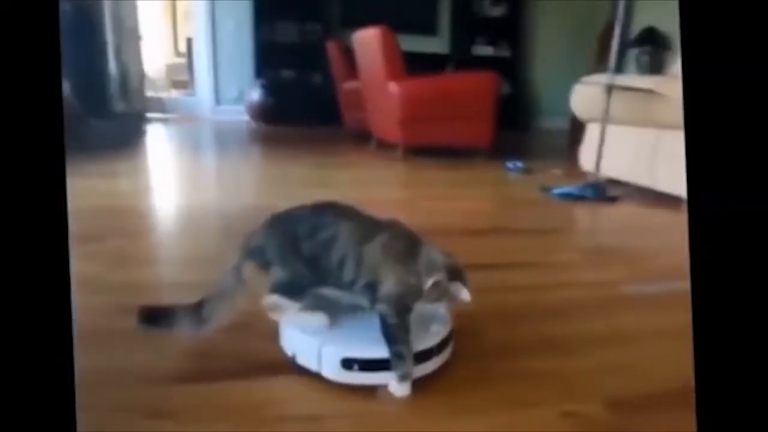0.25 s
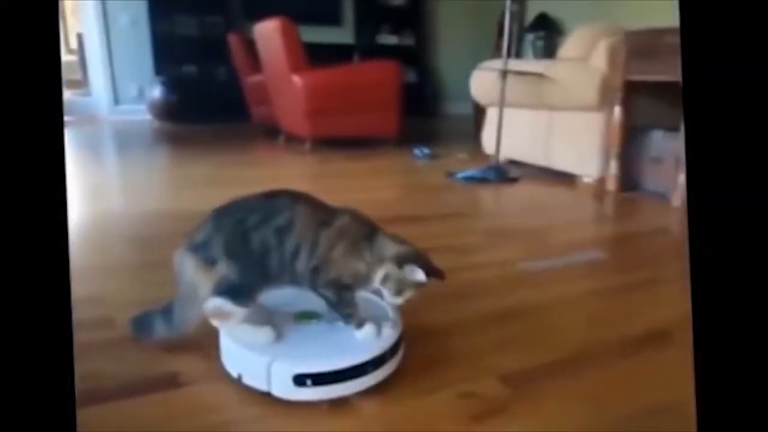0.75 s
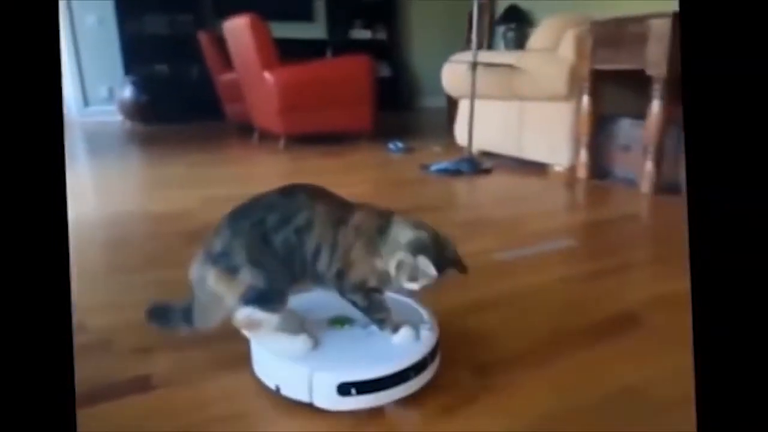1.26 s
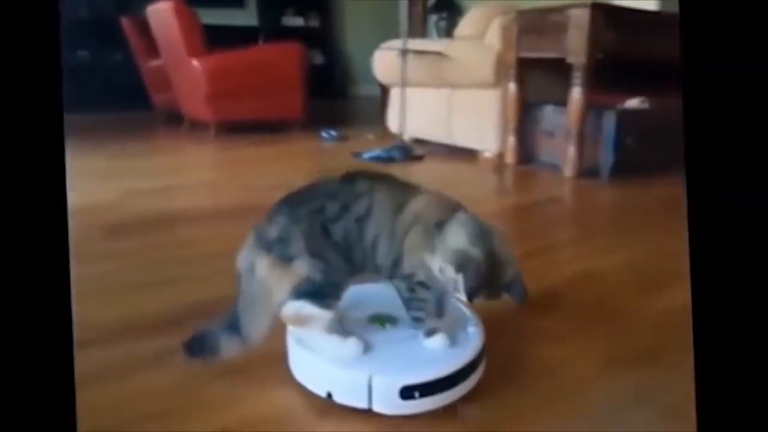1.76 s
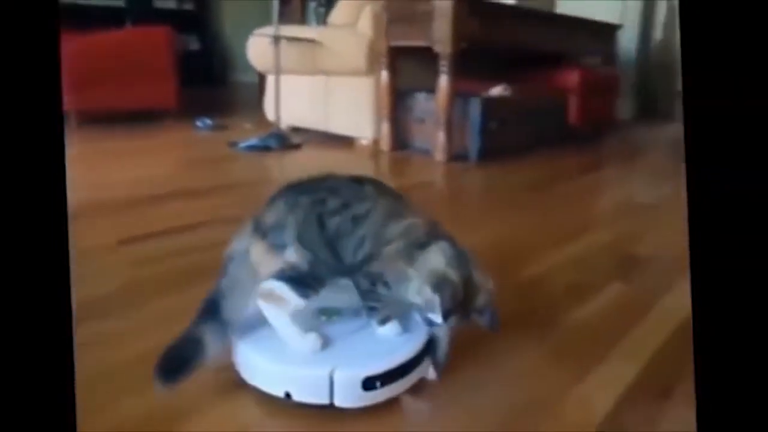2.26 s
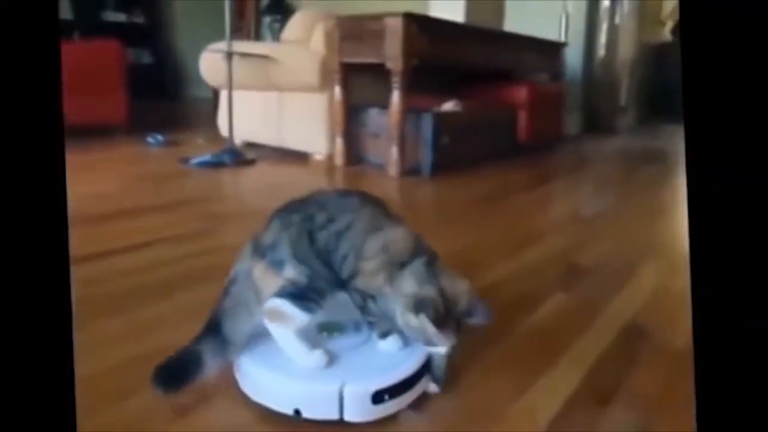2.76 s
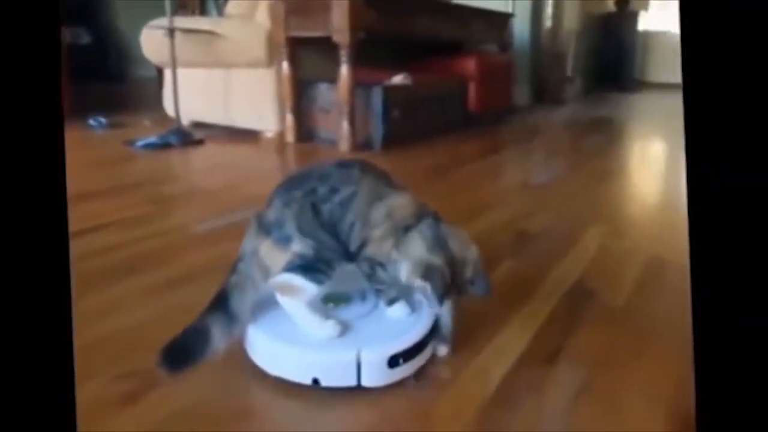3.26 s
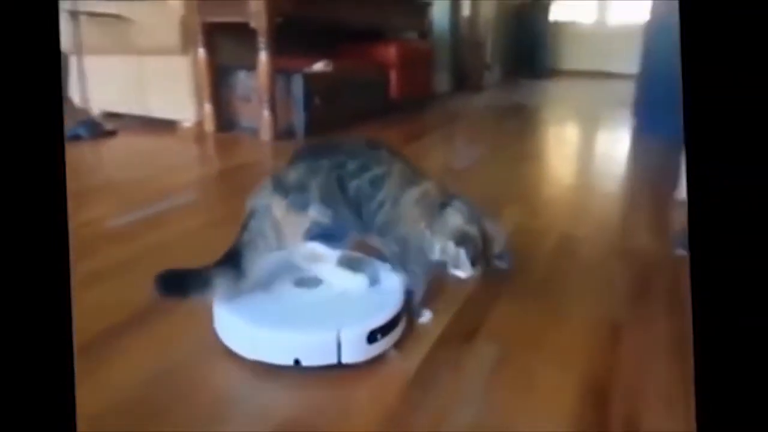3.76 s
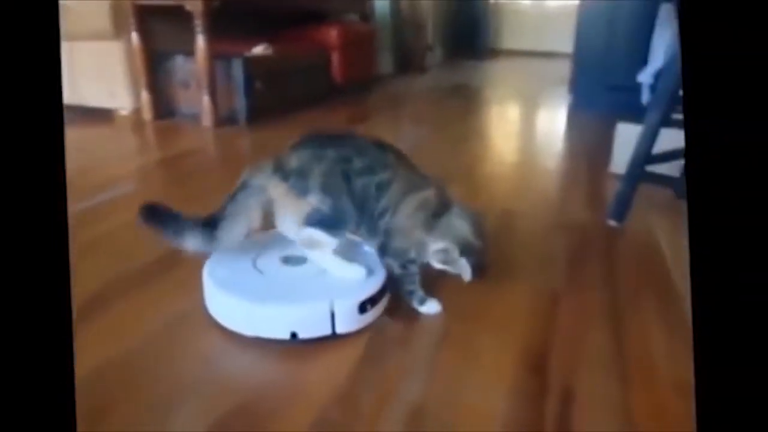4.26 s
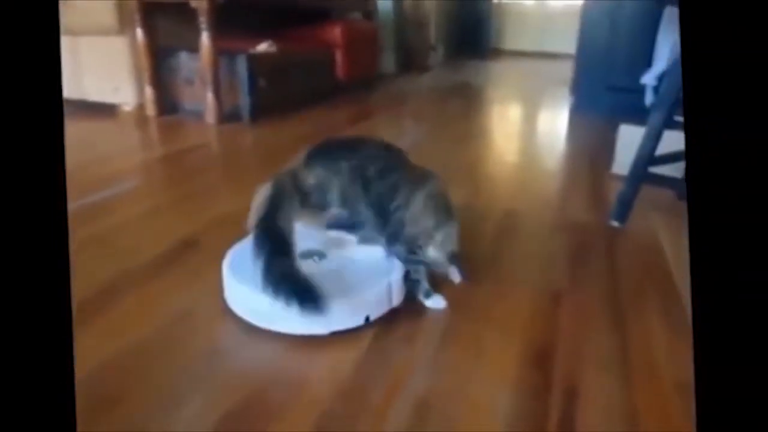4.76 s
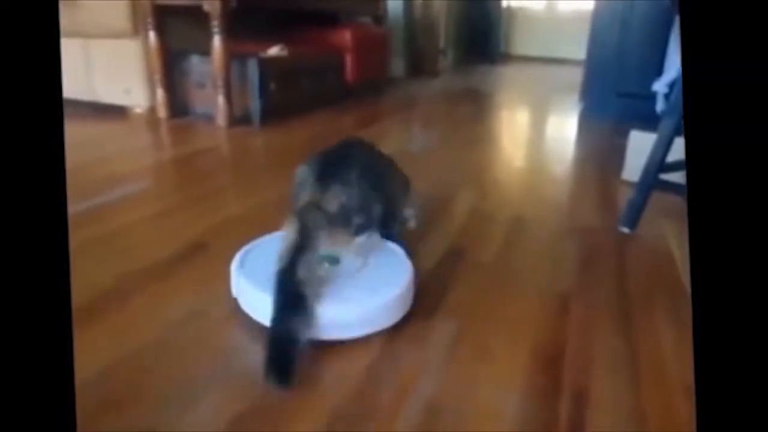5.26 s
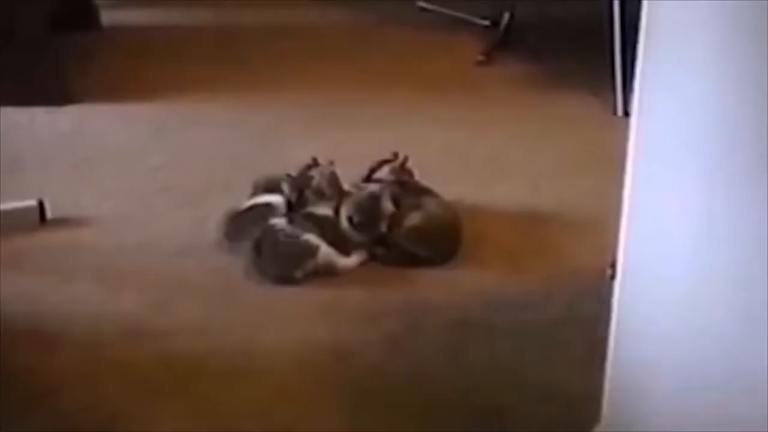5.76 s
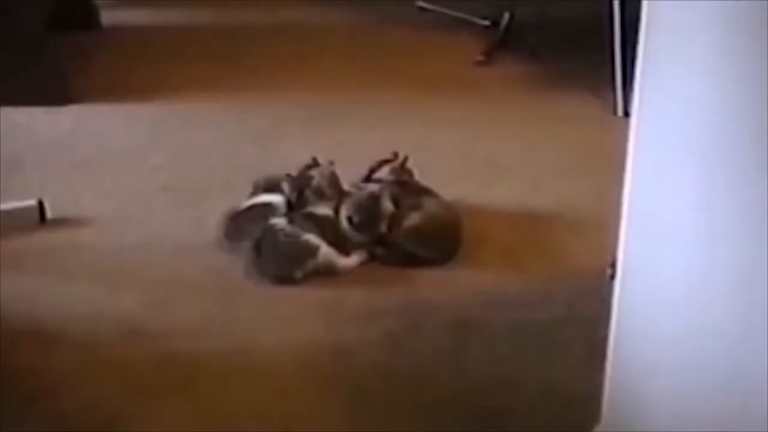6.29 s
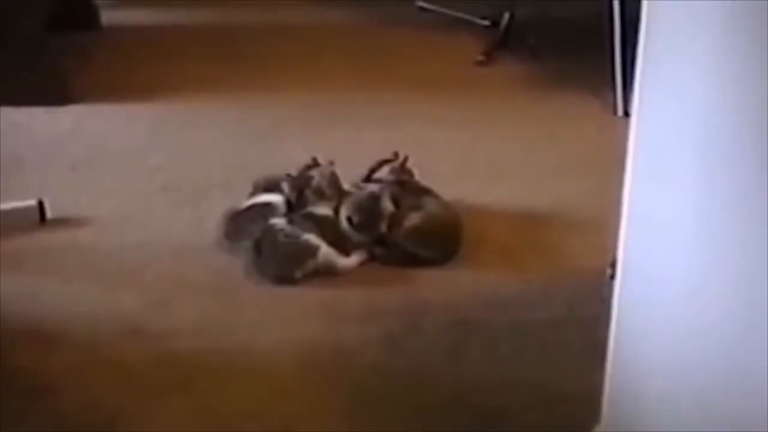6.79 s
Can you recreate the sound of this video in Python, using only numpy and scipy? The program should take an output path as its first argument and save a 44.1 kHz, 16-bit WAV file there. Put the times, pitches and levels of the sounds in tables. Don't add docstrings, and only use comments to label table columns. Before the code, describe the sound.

Steady whirring of a little cleaning robot carrying a cat across floorboards, heard close in a room. Its fan sings and wavers under a fluttering thin gear squeal, with hissing air and scattered soft thumps. Late on, the brush stalls, wobbles lower and recovers weakly as the machine swings away. The sound is thin, gritty and digital, blinks out briefly, and soon stops abruptly, leaving silence.

```python
import sys
import numpy as np
from scipy import signal
from scipy.fft import rfft, irfft, next_fast_len
from scipy.io import wavfile
from scipy.ndimage import uniform_filter1d, map_coordinates

SR = 44100
rng = np.random.default_rng(int(sys.argv[2]) if len(sys.argv) > 2 else 0)


def gain_from_decibels(decibels):
    exponent = np.asarray(decibels, float) / 20
    return 10 ** exponent


def pcm_store(signal):
    levels = np.round(np.clip(np.atleast_2d(signal), -1, 1) * 32767)
    wavfile.write(sys.argv[1], SR, levels.astype(np.int16).T)


N = 310106
BLANK_S, CUT_S = (5.8283, 5.8287, 5.8405, 5.8411), (6.11, 6.119)


def columns(table):
    s, *cols = np.transpose(table)
    return [np.interp(np.arange(N) / SR, s, c) for c in cols]


def walk(rate_hz):
    hold = int(SR / rate_hz)
    steps = np.repeat(rng.standard_normal(N // hold + 1), hold)
    return 1.09 * uniform_filter1d(uniform_filter1d(steps, hold), hold)[:N]


def tone(turns, db, flutter_db):
    level = 2 ** .5 * gain_from_decibels(db + flutter_db * walk(45))
    phase = turns + rng.random() + 0.052 * flutter_db * walk(30)
    return level * np.sin(2 * np.pi * phase)


def strand(turns, db, width_hz):
    k = int(SR / width_hz)
    slow = uniform_filter1d(uniform_filter1d(rng.standard_normal((2, N)), k), k)
    carried = slow[0] * np.cos(2 * np.pi * turns) + slow[1] * np.sin(2 * np.pi * turns)
    return gain_from_decibels(db) * carried / np.std(slow)


def rush(modes, flicker_db):
    size = next_fast_len(N)
    f, out = np.fft.rfftfreq(size, 1 / SR)[1:], 0
    for hz, width, db in modes:
        shape = 1 / (1 + 1j * (f / hz - hz / f) * hz / width)
        spectrum = shape * rfft(rng.standard_normal(size))[1:]
        band = irfft(np.r_[0, spectrum], size)[:N]
        out = out + gain_from_decibels(db + flicker_db * walk(9) + flicker_db * walk(1.5)) * band
    return out / np.std(out)


# t/s, f/Hz, level/dB
BLADE_TONE = [(0.0, 1770, -54), (.08, 1768, -35.5), (.2, 1764, -30), (.385, 1769, -43.5),
              (.435, 1782, -30.5), (.57, 1781, -30), (.67, 1784, -41.5), (1.21, 1780, -40),
              (1.31, 1781, -47.5), (1.9, 1780, -35), (2.54, 1765, -41.5), (2.64, 1766, -31.5),
              (3.46, 1768, -30.5), (4.04, 1768, -39.5), (4.35, 1770, -34), (4.9, 1769, -41),
              (5.08, 1772, -35), (5.17, 1764, -43.5)]
# t/s, level/dB
UNBALANCE_HUM = [(0, -46.5), (.3, -46), (.9, -52.5), (1.9, -62.5), (2.3, -51), (2.9, -59.5), (4.3, -53.5),
                 (5.1, -46.5), (6.11, -46.5)]
# multiple of shaft speed [1], level/dB facing, level/dB turned away
SHAFT_ORDERS = [(3, -54, -54), (5, -59, -55), (6, -58.5, -48.5), (8, -55.5, -61), (12, -65, -56.5)]


def fan(turned):
    blades = 7
    blade_hz, blade_db = columns(BLADE_TONE)
    blade_db = np.where(np.arange(N) / SR > BLANK_S[1], -30.5, blade_db)
    shaft = np.cumsum(uniform_filter1d(blade_hz, 9000)) / SR / blades
    wander_db = np.clip(-31 - blade_db, 0, 8) * .3 * walk(8.2)
    out = tone(blades * shaft, blade_db + wander_db, .7)
    out += tone(2 * shaft, columns(UNBALANCE_HUM)[0] + 1.5 * walk(8), 1.0)
    out += tone(2 * blades * shaft, -50 + 2.5 * walk(5), 1.6)
    for order, near, away in SHAFT_ORDERS:
        out += tone(order * shaft, near + turned * (away - near) + 2.8 * walk(1.2), 1.3)
    return out


# centre t/s, extra drop f/Hz, length t/s, lost level/dB
BRUSH_SNAGS = [
    (.415, 270, .035, 10),
    (.575, 250, .025, 7),
    (.63, 130, .025, -5),
    (.7, 70, .03, 2),
    (2.31, 110, .025, 6),
    (4.962, 0, .008, 14),
    (4.982, -40, .012, -7),
    (5.09, 0, .07, 14),
    (5.22, 40, .03, -5),
]


def brush():
    turn_s, first_free_s, rise_share = .1856, .137, .33
    t = np.arange(N) / SR
    p = ((t - first_free_s) / turn_s + rise_share) % 1
    rise = np.sin(np.pi / 2 * p / rise_share)
    fall = np.clip((p - rise_share) / (1 - rise_share), 0, 1) ** .65
    free = np.where(p < rise_share, rise, np.cos(np.pi / 2 * fall)) ** 2
    stall_s, judder_s, judder_hz, judder_peak_s = (4.635, 4.97), .068, 75, 4.79
    stall = uniform_filter1d(1. * (t > stall_s[0]) * (t < stall_s[1]), size=1500)
    swell = np.exp(-((t - judder_peak_s) / .1) ** 2)
    judder = judder_hz * stall * swell * np.cos(2 * np.pi * (t - stall_s[0]) / judder_s)
    snag_hz, snag_db = np.zeros(N), np.zeros(N)
    for s, hz, length, db in BRUSH_SNAGS:
        catch = np.exp(-((t - s) / length) ** 2)
        snag_hz += hz * catch
        snag_db += db * catch
    return free + stall * (1 - free), snag_hz - judder, snag_db


# t/s, free f/Hz, free level/dB, level/dB lost while dragging
GEAR_MESH = [(0, 4096, -35, -0.5), (.33, 4143, -38.5, -5.5), (.55, 4086, -37, 0), (.9, 4125, -37.5, -3.5),
             (1.3, 4163, -33, -1.5), (1.6, 4152, -32, 4.5), (2.2, 4180, -33.5, 4), (2.4, 4100, -36.5, 18),
             (2.75, 4165, -37, 14.5), (3.6, 4176, -36.5, 12.5), (4.1, 4198, -35.5, 13),
             (4.58, 4200, -45, -5), (4.66, 3978, -42.5, -1), (4.755, 3913, -34, 1),
             (4.955, 3650, -44.5, -5), (4.97, 4177, -40.5, -3), (5.35, 4110, -46, 5), (5.6, 4090, -67, 2)]
# multiple of mesh [1], level/dB relative to mesh
MESH_COMPANIONS = [(.945, -6.5), (1.056, -17), (.413, -14), (.25, -13), (.125, -21)]


def gears(turned):
    free_hz, free_db, drag_db = columns(GEAR_MESH)
    free, snag_hz, snag_db = brush()
    drag_hz = 165.4
    mesh_hz = free_hz - drag_hz * (1 - free) - snag_hz + (9 + 14 * turned) * walk(35)
    mesh_db = free_db - drag_db * (1 - free) - snag_db
    mesh_db += 1.6 * turned * walk(7) + 3.5 * turned * walk(28)
    half_db = -42 - 3 * turned - 7 * free - 4 * np.clip(snag_hz / 200, 0, 1)
    half_db += -11.5 * np.clip((turned - .53) / 0.24, 0, 1) + 1.0 * walk(5)
    turns = np.cumsum(mesh_hz) / SR
    out = tone(turns, mesh_db + .3, 1.3) + tone(turns / 2, half_db - .3, 1.5)
    out += strand(turns, mesh_db - 11 + 6 * turned, 200)
    out += strand(turns / 2, half_db - 6, 120)
    for multiple, db in MESH_COMPANIONS:
        out += tone(multiple * turns, mesh_db + db - 9 * turned - 2 * free + 1.49 * walk(4), 1.8)
    return out


def toward(modes, turned):
    return [(hz, width, near + turned * (away - near)) for hz, width, near, away in modes]


# t/s, level/dB
AIR_NEARNESS = [(0, -3), (.35, 2), (.8, -1.5), (1.3, -0.7), (2, 2), (2.5, -0.1), (3, 0.3), (4.2, -1.05),
                (5, -2), (6.11, -2)]
# f/Hz, width f/Hz, level/dB facing, level/dB turned away
NOZZLE_MODES = [(1290, 140, -11.5, -6), (1670, 180, -2.5, -5), (2030, 180, -13.5, -6),
                (2540, 180, -21, -14), (2735, 250, -9, -15.5), (3136, 280, -9, -4.5), (3620, 260, -2.5, -6),
                (4043, 200, 0.5, -8.5), (4460, 270, -15.5, -4.5), (4680, 200, -7.5, -5.5)]
# f/Hz, width f/Hz, level/dB facing, level/dB turned away
SHELL_MODES = [(675, 170, -16, -9), (806, 160, -8.5, -5.5), (909, 62, 3.5, -1.5), (1004, 62, -2, 0.5),
               (1080, 160, -15.5, -8.5)]


def air(turned):
    near_db = columns(AIR_NEARNESS)[0]
    out = gain_from_decibels(-35.5 + 0.42 * near_db) * rush(toward(NOZZLE_MODES, turned), 1.3)
    out += gain_from_decibels(-39.8 + 1.3 * near_db) * rush(toward(SHELL_MODES, turned), 1.2)
    whistle_db = -78 + 88 * turned * (1 - turned)
    return out + strand(4690 * np.arange(N) / SR, whistle_db, 160)


# t/s, centre f/Hz
WHEEL_SPEED = [(0, 3150), (.6, 3157), (2.2, 3211), (3.3, 3152), (4.1, 3089), (4.65, 3062), (5.3, 3169),
               (5.45, 3093), (6.11, 3017)]


def wheels():
    db = -43 + 1.3 * columns(AIR_NEARNESS)[0]
    turns = np.cumsum(columns(WHEEL_SPEED)[0] + 8 * walk(5) + 28 * walk(20)) / SR
    upper = strand(1.015 * turns, db - 6.5 + 2.5 * walk(4.6), 45)
    return upper + strand(.985 * turns, db - 4 + 0.7 * walk(5), 45)


# centre t/s, peak level/dB, f/Hz
KNOCKS = [(.1846, -15, 590), (.377, -31.5, 193.3), (1.28, -37.5, 250.3), (1.665, -41.5, 501),
          (2.77, -33, 230.2), (2.8, -24, 420.6), (4.212, -33, 260), (4.348, -28, 331.5),
          (4.434, -36, 198.6), (4.445, -20.5, 1003), (4.898, -19.5, 502.7)]


def bumps():
    out, t = np.zeros(N), np.arange(-1500, 3000) / SR
    rattle_band = signal.butter(2, (150, 900), "band", fs=SR)
    for k, (s, db, hz) in enumerate(KNOCKS):
        swing = (-1) ** k * np.cos(2 * np.pi * hz * t - .5)
        blow = swing * np.exp(-(t * hz / .4) ** 2)
        blow = signal.lfilter(*signal.butter(2, hz / 3, "high", fs=SR), blow)
        rattle = signal.lfilter(*rattle_band, rng.standard_normal(len(t)))
        rattle *= np.exp(-t / .022) * (t > 0)
        out[int((s + t[0]) * SR):][:len(t)] += gain_from_decibels(db) * (blow + .35 * rattle)
    return out


# f/Hz, width f/Hz, level/dB
CHAMBER_MODES = [(283.4, 110, -8), (398.7, 61.5, 3), (446, 60, 3.5), (537, 120, -15)]


def chamber_and_boards():
    t = np.arange(N) / SR
    shaken = np.max([np.exp(-((t - s) / .06) ** 2) for s, _, _ in KNOCKS], axis=0)
    out = gain_from_decibels(-47.5 + 1.0 * shaken + 1.5 * walk(5.5)) * rush(CHAMBER_MODES, 1.1)
    slowed = t > 2.1
    rumble_db = -61 + slowed * (-11 + 7.5 * shaken) + 2.5 * walk(8.5)
    return out + gain_from_decibels(rumble_db) * rush([(35, 40, -10), (90, 70, -4.0), (170, 91, 2.0)], 2.8)


# t/s, share [0-1]
OUTLET_TURN = [(0, 0.35), (.7, 0.15), (2.2, 0.01), (2.7, 0.37), (3.5, .5), (4.3, 0.68), (5, .75),
               (5.5, 0.98), (6.11, 0.96)]


def scene():
    turned = np.clip(columns(OUTLET_TURN)[0], 0, 1)
    out = fan(turned) + gears(turned) + air(turned) + wheels() + bumps() + chamber_and_boards()
    return (out + gain_from_decibels(-62.0) * rng.standard_normal(N))[None]


SKIP_TIMES = [.9665, 1.875, 1.9665, 2.839, 3.806, 4.9665, 5.75, 5.9665]
SKIP_FADES = [.002, .012, .002, .007, .01, .002, .012, .002]


def skips(x, t):
    swap = np.zeros(N)
    for k, (s, fade) in enumerate(zip(SKIP_TIMES, SKIP_FADES)):
        swap += (-1) ** k * np.clip((t - s) / fade + .5, 0, 1)
    return (1 - swap) * x + swap * np.roll(x, 12)


def top_cut(x):
    return signal.sosfilt(signal.butter(12, 15970, fs=SR, output="sos"), x)


def record(dry):
    n = np.arange(N)
    t = n / SR
    x = signal.sosfilt(signal.cheby2(8, 45, 5560, fs=SR, output="sos"), dry[0])
    x = skips(x, t)
    ratio = 48000 / SR
    x = map_coordinates(x, [np.floor(n * ratio) / ratio], order=3)
    x *= np.interp(t, BLANK_S, (1, 0, 0, 1)) * np.interp(t, CUT_S, (1, 0))
    offset, drain_s = .0045, .225
    x += offset * np.where(t > CUT_S[1], np.exp((CUT_S[1] - t) / drain_s), 0)
    x = signal.sosfilt(signal.ellip(10, .2, 60, 15700, fs=SR, output="sos"), x)
    x = np.round(x * 2 ** 15) / 2 ** 15
    return top_cut(x[None])


dry = scene()
out = record(dry)
pcm_store(out)
```